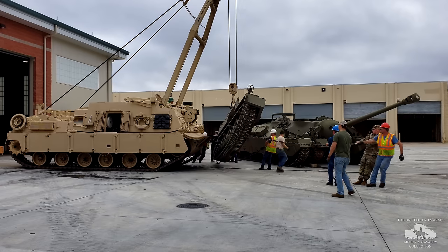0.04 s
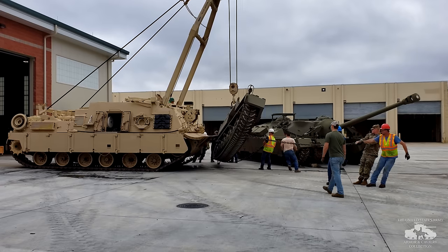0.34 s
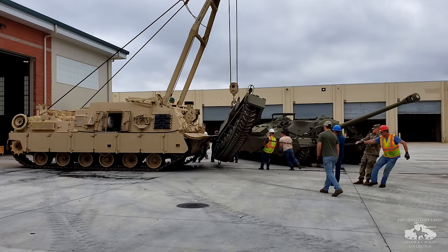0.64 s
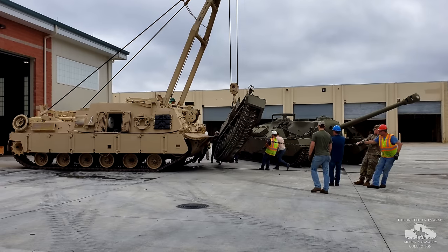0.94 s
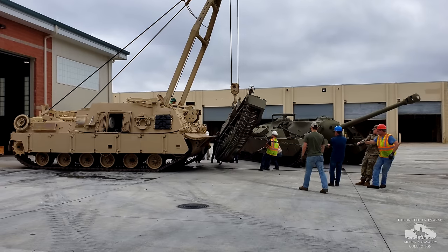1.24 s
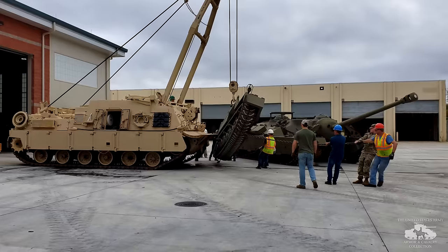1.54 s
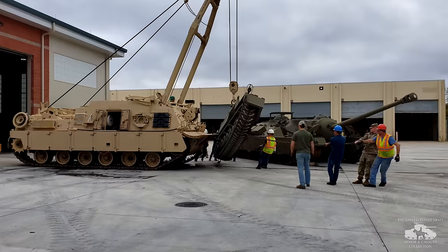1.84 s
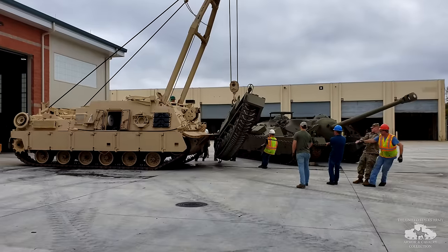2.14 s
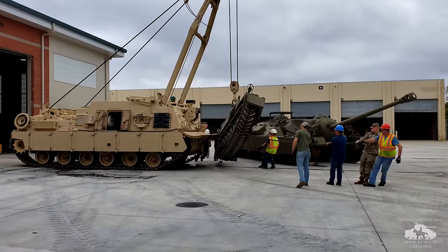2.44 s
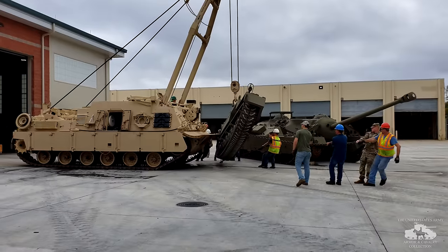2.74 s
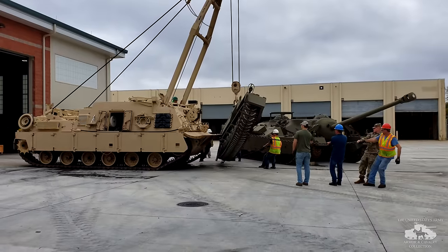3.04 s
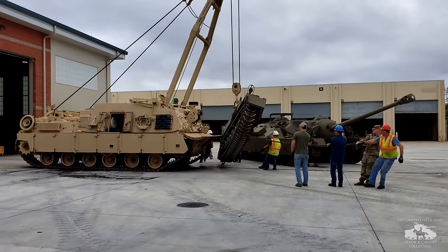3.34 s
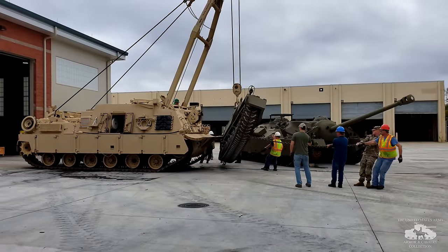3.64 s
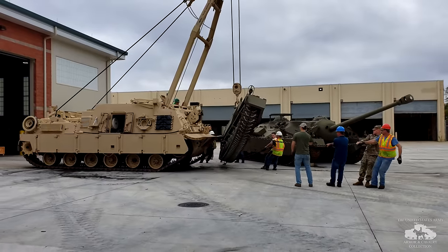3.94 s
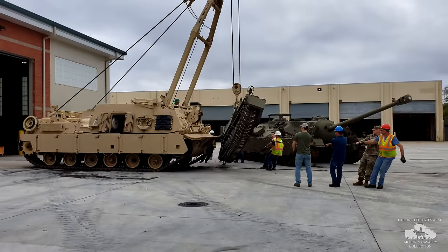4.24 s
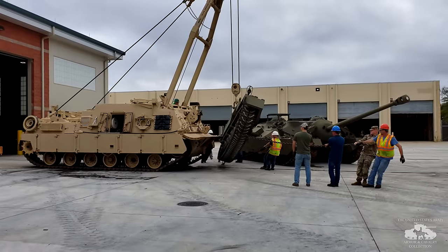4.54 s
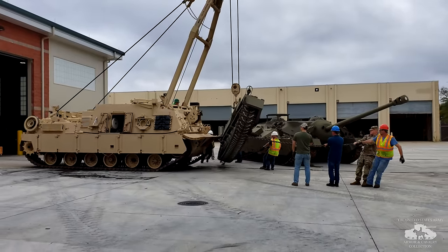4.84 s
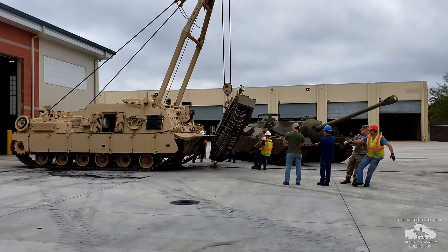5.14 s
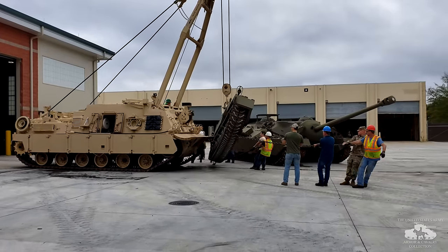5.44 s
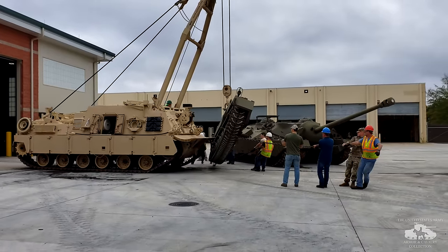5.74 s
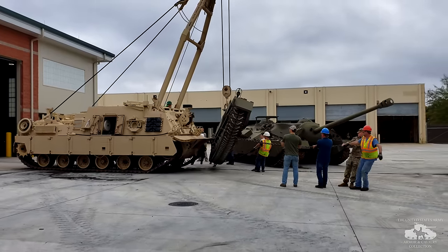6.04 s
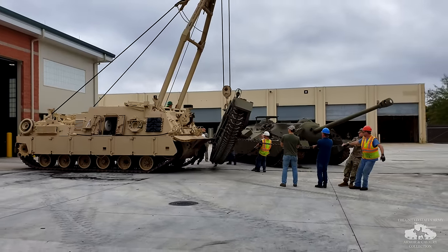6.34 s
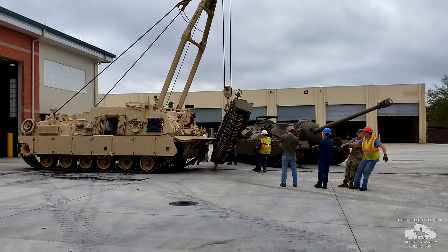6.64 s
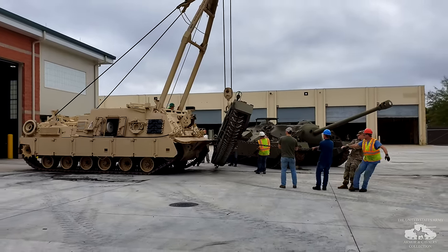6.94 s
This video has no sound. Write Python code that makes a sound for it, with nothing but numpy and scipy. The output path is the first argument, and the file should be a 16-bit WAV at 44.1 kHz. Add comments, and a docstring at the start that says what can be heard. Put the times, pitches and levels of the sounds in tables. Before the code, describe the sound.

A large tracked recovery vehicle idles on an open concrete yard for the whole seven seconds or so. The main sound is its diesel engine: a deep hum, nearly constant in pitch, throbbing about eight times a second over a low rumble. Soft exhaust booms and small, hard valve knocks repeat in the same rhythm. A quieter, rapid metallic clatter comes through the hull plates, with a faint hiss of cooling air above it. Tiny bright ticks stand out slightly at the very start, at about 1 second and twice between 3.6 and 3.9 seconds. A thin gear whine swells gradually but stays in the background. From about 4 seconds to the end, the engine takes a little more load: the hum softens slightly and the clatter grows a touch. The sound is in stereo, somewhat to the left, with almost no echo.

```python
"""A throbbing diesel hum: a tracked recovery vehicle idles on a concrete yard, its crane holding a load.
The twelve cylinders sound through the exhaust, with one weak cylinder and a few knocks in every cycle.
Valve gear clatters through the hull plates in step with them, gears whine and cooling air hisses.
The vehicle stands left of a stereo pair, so the left microphone hears it sooner and louder."""
import sys
import numpy as np
from scipy import signal
from scipy.fft import rfft, irfft, next_fast_len
from scipy.io import wavfile
from scipy.ndimage import map_coordinates

SR = 44100
rng = np.random.default_rng(int(sys.argv[2]) if len(sys.argv) > 2 else 0)


def inscribe(sig):
    """Save sig as 16-bit PCM at rate SR to the path in sys.argv[1].

    A 1-D sig is mono; a 2-D sig holds one channel per row.
    Samples are clipped to [-1, 1] before scaling.
    """
    pcm = np.round(np.clip(np.atleast_2d(sig).T, -1, 1) * 32767)
    wavfile.write(sys.argv[1], SR, pcm.astype(np.int16))


N = 308700

# Faint bright ticks: t/s, level/dB before filtering
BRIGHT_TICKS = [(0.0413, -34), (1.0494, -37), (3.6494, -37), (3.8794, -37)]
# Spectrum of the turbulent exhaust gas: f/Hz, relative level/dB
GAS_SPECTRUM = [(10, -76), (25, -65), (42, -60), (65, -61), (95, -55), (125, -62), (170, -67), (260, -77),
                (500, -110)]
# Low tones out of step with the engine: f/Hz, level/dB
DRONE_TONES = [(38.6, -48), (41.4, -44), (47.6, -49), (62, -52), (83, -40), (89.3, -40)]
# Spectrum of the air at the grilles: f/Hz, relative level/dB
GRILLE_SPECTRUM = [(2150, -77.5), (2700, -71), (3100, -77), (3650, -73), (4300, -82.5), (5300, -82),
                   (6100, -90), (7500, -87), (8400, -93.5), (10500, -92), (12100, -92), (12900, -93.5),
                   (13700, -93.5), (15000, -94.5)]
# Drift of the treble hiss: t/s, relative level/dB
HISS_DRIFT = [(0, -53), (.8, -54), (1.35, -53), (1.9, -56), (2.95, -52.5), (3.8, -53), (4.25, -54.5),
              (7, -53.5)]
# Tones of the gear teeth: multiple of the cycle rate, level/dB
GEAR_TONES = [(44, -57), (46, -58), (48, -56), (50, -57), (57, -57), (84, -57), (95, -55), (99, -57),
              (101, -57), (105, -56), (108, -56), (111, -57), (120, -52), (142, -58)]
# Tones of the exhaust pipe: multiple of the cycle rate, level/dB
PIPE_TONES = [(26, -53), (27, -50.5), (34, -50)]
# The hull's answer to the clatter: f/Hz, relative level/dB
HULL_SPECTRUM = [(140, -46), (180, -54), (250, -64.5), (340, -59.5), (420, -68), (520, -64), (720, -68),
                 (820, -64.5), (980, -64), (1215, -61.5), (1330, -70), (1500, -69.5), (1700, -65),
                 (2150, -75)]
# Ringing hull plates: f/Hz, width/Hz, lift/dB
PLATE_MODES = [(465, 21, 0), (804, 8, 7.5), (1013, 12, 2), (1417, 22, 3.5), (1610, 24, 2.5),
               (2740, 110, 0.5), (5300, 150, 1)]
# Hard valve knocks: place in the cycle/0-1, f/Hz, peak level/dB at mean load
VALVE_KNOCKS = [(.019, 904, -35), (.11, 910, -35.5), (.147, 1020, -35), (.36, 1185, -29),
                (.472, 1040, -35.5), (.58, 1130, -35.5), (.735, 1010, -37.5), (.785, 830, -36),
                (.825, 975, -32), (.98, 1154, -28.5)]
# Exhaust booms: place in the cycle/0-1, f/Hz, length/s, peak level/dB at mean load
EXHAUST_BOOMS = [(.047, 159.5, .018, -41), (.232, 169, 0.0089, -33.5), (0.258, 232, .011, -37),
                 (.475, 336, .0078, -28.7), (.554, 212, 0.0094, -38.5), (.778, 324, 0.0076, -39),
                 (0.845, 161, 0.0051, -38)]
# Tones from the weak cylinder: multiple of the cycle rate, level/dB
WEAK_CYLINDER_TONES = [(9, -37), (10, -46.5), (11, -36.5), (15, -47), (16, -76), (17, -47.5)]
# The engine's firing rate: t/s, f/Hz
FIRING_RATE = [(0.0, 101.16), (1.3, 101.0), (1.9, 101.65), (2.6, 101.1), (3.3, 101.9), (3.9, 101.38),
               (4.6, 101.95), (5.3, 101.7), (6.1, 101.92), (7.0, 101.47)]
# The engine's slowly building load: t/s, load/0-1
ENGINE_LOAD = [(0, 0), (2.6, 0.14), (4.5, 0.37), (7, 1)]
# Likeness of the two microphone signals: f/Hz, correlation/0-1
MIC_LIKENESS = [(100, .99), (340, .94), (520, .83), (770, .7), (1050, .8), (1750, .62), (2150, .25),
                (2650, .7), (3300, .45), (4100, .25), (5200, .42), (12000, .27)]
# Left microphone over right: f/Hz, level/dB
LEFT_LIFT = [(50, 1.5), (100, 2.6), (220, 1.8), (340, 4.2), (650, 3), (1100, 6), (1600, 6.5), (2500, .3),
             (3400, 4.5), (4400, .4), (6500, 3.8), (9000, 8.5), (12000, 4), (15000, 12)]
# Left microphone ahead of right: f/Hz, lead/s
LEFT_LEAD = [(100, .00045), (220, .00026), (340, .00034), (700, .00025), (1800, .00028), (2600, .00036),
             (15000, .00035)]

CYLINDERS = 12
TOP_HZ = 15750  # upper band limit


def amp(db):
    """Decibels to gain."""
    return 10 ** (np.asarray(db) / 20)


def along(points, hz):
    """Read (f/Hz, value) points on a log frequency axis."""
    f, values = np.transpose(points)
    return np.interp(np.log(hz + 1), np.log(f + 1), values)


def curve(points):
    """Read (t/s, value) points at every sample."""
    return np.interp(np.arange(N) / SR, *np.transpose(points))


def wobble(rate):
    """A smooth random curve, rate knots a second."""
    knots = rng.standard_normal(int(N * rate / SR) + 4)
    return map_coordinates(knots, [np.arange(N) * rate / SR])


def filtered(x, response):
    """Pass x through a complex frequency response."""
    size = next_fast_len(N + SR // 2)
    return irfft(rfft(x, size) * response(np.fft.rfftfreq(size, 1 / SR)), size)[..., :N]


def above(hz, edge_hz, order=6):
    """Gain of a high-pass."""
    return 1 / np.sqrt(1 + (edge_hz / (hz + 1)) ** (2 * order))


def below(hz, edge_hz):
    """Gain of a steep low-pass."""
    return np.sqrt(1 - above(hz, edge_hz) ** 2)


def spread(pair, colour):
    """Two unrelated signals become a coloured left and right, partly alike, at rms 1."""
    def mid_and_side(hz):
        turn = np.arccos(along(MIC_LIKENESS, hz)) / 2
        return colour(hz) * np.array([np.cos(turn), np.sin(turn)])
    mid, side = filtered(pair, mid_and_side)
    stereo = np.array([mid + side, mid - side])
    return stereo / np.sqrt(np.mean(stereo ** 2))


def walls(x, count=16, echo_db=-28):
    """Vehicle sides and shed walls add weak treble echoes, by paths some 1-7 m longer."""
    delay_s = rng.uniform(.003, .02, (count, 1))
    echoes = lambda hz: np.exp(-2j * np.pi * hz * delay_s).sum(0) * above(hz, 1500, order=2)
    return filtered(x, lambda hz: 1 + amp(echo_db) * echoes(hz))


def ticks(per_second=14, decay_s=.0039):
    """A few faint bright ticks stand out from many smaller, duller ones."""
    t = np.arange(SR // 40) / SR
    bright = [(start_s, db, 9000) for start_s, db in BRIGHT_TICKS]
    small = [(when * N / SR, -52 + 9 * force ** 3, 4500 + 1500 * pitch)
             for when, force, pitch in rng.random((int(per_second * N / SR), 3))]
    out = np.zeros(N + SR)
    for start_s, db, hz in bright + small:
        band = signal.butter(2, [hz * .57, min(hz * 1.2, TOP_HZ)], "bandpass", fs=SR)
        burst = rng.standard_normal(len(t)) * np.exp(-t / decay_s)
        out[round(start_s * SR):][:len(t)] += amp(db) * signal.lfilter(*band, burst)
    return out[:N]


def cooling_air(cycle, pulse_db=.9, flutter_db=.64):
    """Air rushes through the grilles under a finer hiss; both pulse with one bank of cylinders."""
    drift_db = curve(HISS_DRIFT)
    rush_db = -42.14 + .36 * (drift_db - drift_db.mean())  # partly follows the hiss
    grille = lambda hz: amp(along(GRILLE_SPECTRUM, hz)) * above(hz, 1840) * (hz < TOP_HZ)
    rush = spread(rng.standard_normal((2, N)), lambda hz: grille(hz) * below(hz, 7000))
    hiss = spread(rng.standard_normal((2, N)), lambda hz: grille(hz) * above(hz, 5850))
    rush *= amp(rush_db + .7 * wobble(250))
    hiss *= amp(drift_db + 3.36 + .67 * wobble(300))
    pulse = np.cos(2 * np.pi * (CYLINDERS / 2 * cycle + .076))
    return amp(pulse_db * pulse + flutter_db * wobble(30)) * (rush + hiss)


def rumble(gas_db=-38):
    """Turbulent exhaust gas and a few wavering low tones."""
    out = amp(gas_db) * spread(rng.standard_normal((2, N)), lambda hz: amp(along(GAS_SPECTRUM, hz)))
    t = np.arange(N) / SR
    for hz, db in DRONE_TONES:
        phase = 2 * np.pi * hz * t + .46 * wobble(1.4) + rng.uniform(0, 2 * np.pi)
        out += np.sqrt(2) * amp(db) * np.sin(phase)
    return out


def gears_and_pipe(cycle, whine_multiple=131, start_db=-58, full_db=-41.3, swell_s=3.0):
    """Gear teeth and exhaust pipe sing in step with the engine, wavering in the yard's moving air."""
    def tone(multiple, db, waver):
        phase = 2 * np.pi * (multiple * cycle + rng.random()) + waver * wobble(11)
        return np.sqrt(2) * amp(db + 4 * waver * wobble(6)) * np.sin(phase)
    teeth = sum(tone(multiple, db, waver=.45) for multiple, db in GEAR_TONES)
    pipe = sum(tone(multiple, db, waver=.2) for multiple, db in PIPE_TONES)
    whine_db = full_db + (start_db - full_db) * np.exp(-np.arange(N) / SR / swell_s)  # one gear swells
    return teeth + pipe + tone(whine_multiple, whine_db, waver=.18)


def hull_plates(hz):
    """Each hull plate lifts a narrow band of whatever shakes it."""
    return amp(sum(db / (1 + (2 * (hz - centre) / width) ** 2) for centre, width, db in PLATE_MODES))


def valve_clatter(cycle, level_db=-33.64, load_db=1.3, repeat_share=.44, points=5200):
    """Two valves a cylinder strike in turn; each blow rings partly as it did in the cycle before."""
    valves = 2 * CYLINDERS
    place = cycle + .00027 * wobble(25)
    repeating = np.array([np.interp(place % 1 * points, np.arange(points), one_cycle)
                          for one_cycle in rng.standard_normal((2, points))])
    repeat_band = lambda hz: np.sqrt(repeat_share) * above(hz, 436) * below(hz, 1880)
    fresh = filtered(rng.standard_normal((2, N)), lambda hz: np.sqrt(1 - repeat_band(hz) ** 2))
    noise = filtered(repeating, repeat_band) + fresh
    blow, age = np.divmod((place + 1) * valves, 1)
    blow = blow.astype(int)
    valve_db = .67 * rng.standard_normal(valves)[blow % valves]  # each valve has its own strength
    scatter_db = .04 * rng.standard_normal(blow.max() + 1)[blow]
    blows = noise * amp(valve_db + scatter_db) * np.exp(-.33 * age)
    hull = lambda hz: amp(along(HULL_SPECTRUM, hz)) * above(hz, 263, order=2) * below(hz, 2350)
    return amp(level_db + load_db * curve(ENGINE_LOAD)) * spread(blows, hull)


def knocks(cycle, cycle_hz, rows, pivot_hz, tilt_db, scatter_db):
    """Short rings return every cycle; under load those above the pivot gain and lower ones lose."""
    load = curve(ENGINE_LOAD)
    load -= load.mean()
    out = np.zeros(N)
    for place, hz, length_s, db in rows:
        loose_cycle = cycle + .0014 * wobble(9)
        t = ((loose_cycle - place + .5) % 1 - .5) / cycle_hz  # seconds from the nearest knock
        span_s = length_s * (1 + .3 * np.tanh(t / length_s))  # rises faster than it dies
        level_db = db + tilt_db * np.log2(hz / pivot_hz) * load + scatter_db * wobble(9.1)
        out += amp(level_db) * np.exp(-(t / span_s) ** 2) * np.sin(2 * np.pi * hz * t)
    return out


def exhaust(cycle, firing_db=-15.5, load_db=-3.5, bank_db=-23.5, weak_place=10 / 12):
    """Twelve firings a cycle; the two banks differ, and one weak cylinder makes the hum throb."""
    angle = 2 * np.pi * cycle
    firing = amp(firing_db + load_db * curve(ENGINE_LOAD) + .34 * wobble(12)) * np.cos(CYLINDERS * angle)
    banks = amp(bank_db + .26 * wobble(11)) * np.cos(CYLINDERS / 2 * angle)
    weak_angle = angle - 2 * np.pi * weak_place
    shortfall = sum(amp(db) * np.cos(multiple * weak_angle) for multiple, db in WEAK_CYLINDER_TONES)
    return np.sqrt(2) * (firing + banks - shortfall * amp(2.2 * wobble(5.6)))


def microphone_pair(hz):
    """The left microphone is nearer the vehicle and hears it sooner and louder."""
    side = np.array([[.5], [-.5]])
    gain = amp(side * along(LEFT_LIFT, hz))
    gain /= np.sqrt(np.mean(gain ** 2, axis=0))
    return gain * np.exp(2j * np.pi * hz * side * along(LEFT_LEAD, hz))


def scene():
    """The idling vehicle as heard from the yard, with the crankshaft setting the pace."""
    cycle_hz = curve(FIRING_RATE) / CYLINDERS
    cycle = np.cumsum(cycle_hz) / SR - .0315  # running count of engine cycles
    booms = knocks(cycle, cycle_hz, EXHAUST_BOOMS, pivot_hz=240, tilt_db=6, scatter_db=.7)
    valve_rows = [(place, hz, .0022, db) for place, hz, db in VALVE_KNOCKS]  # all one length
    valves = knocks(cycle, cycle_hz, valve_rows, pivot_hz=975, tilt_db=16, scatter_db=0)
    clatter_and_air = walls(filtered(valve_clatter(cycle) + cooling_air(cycle), hull_plates))
    engine = exhaust(cycle) + booms + valves + gears_and_pipe(cycle)
    return filtered(engine + rumble() + clatter_and_air + ticks(), microphone_pair)


def record(dry):
    """The microphones pass nothing above the band limit."""
    return filtered(dry, lambda hz: hz < TOP_HZ)


dry = scene()
out = record(dry)
inscribe(out)
```